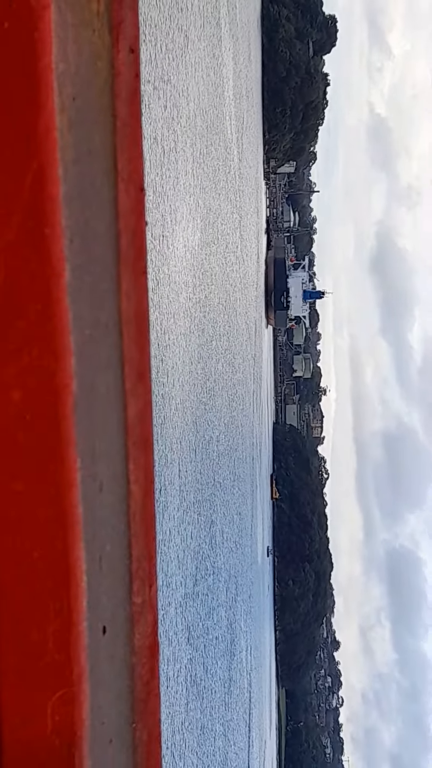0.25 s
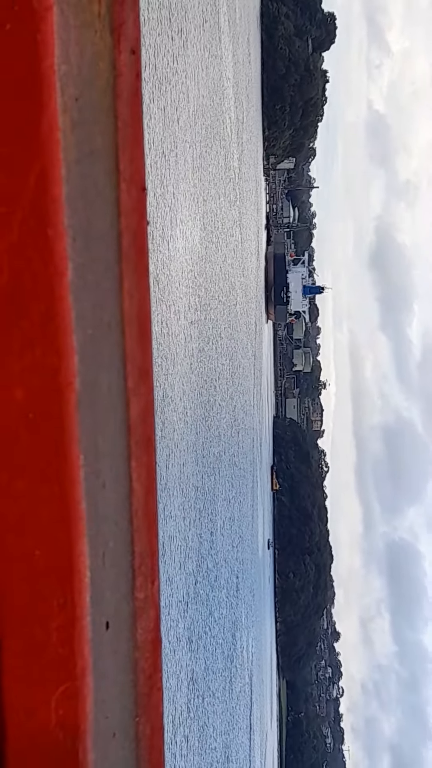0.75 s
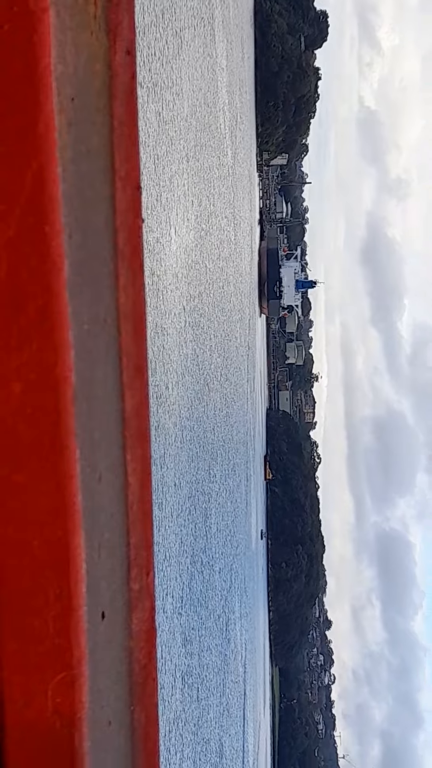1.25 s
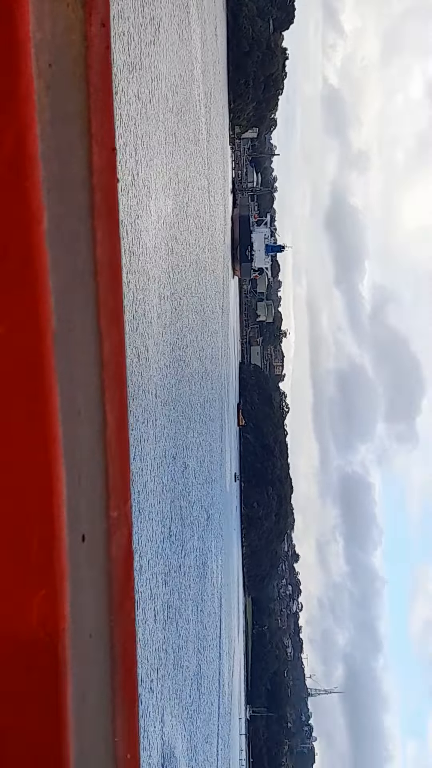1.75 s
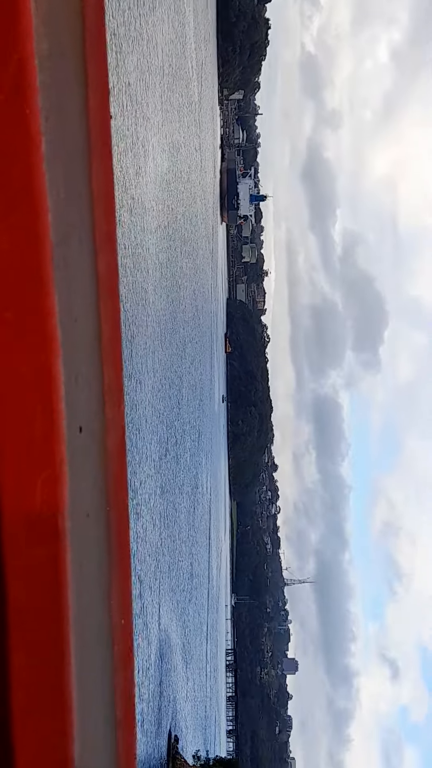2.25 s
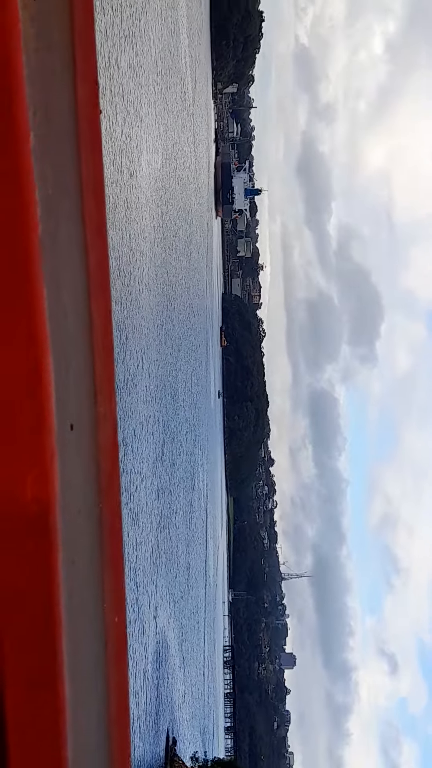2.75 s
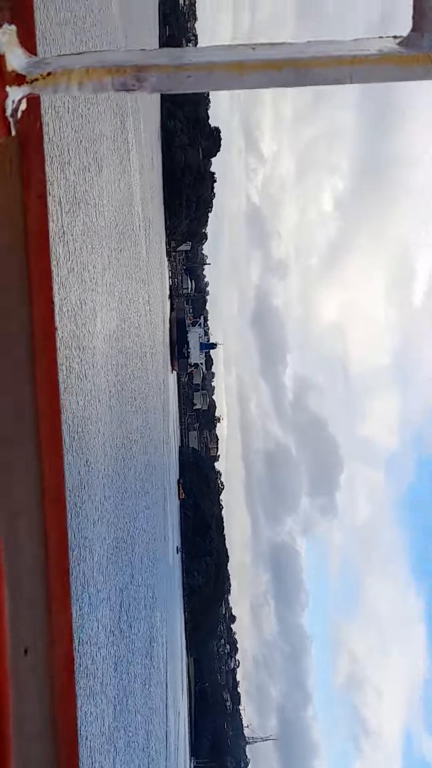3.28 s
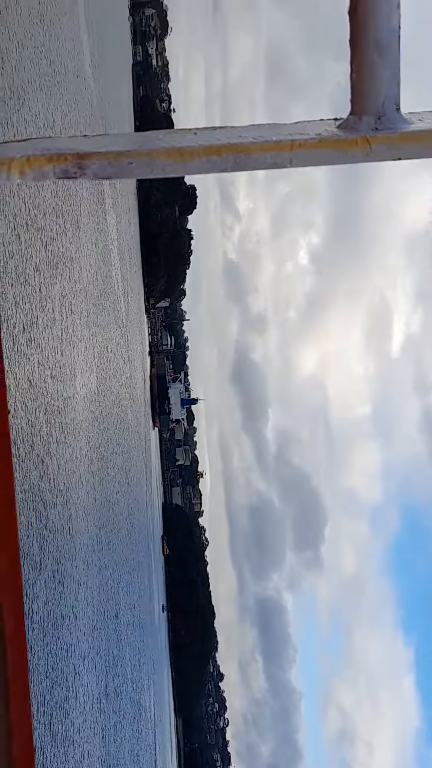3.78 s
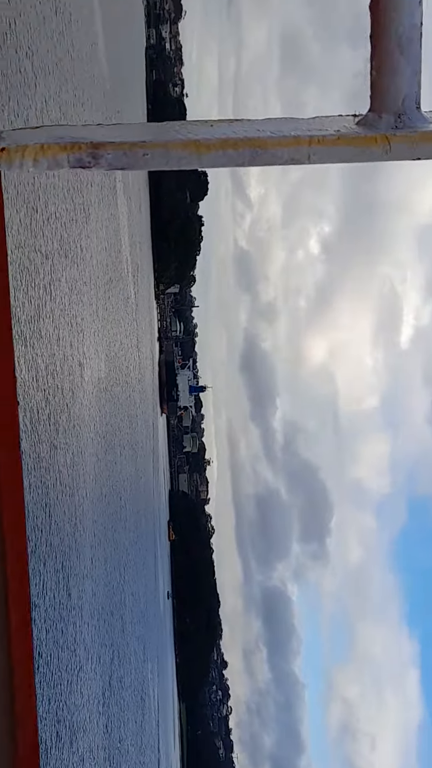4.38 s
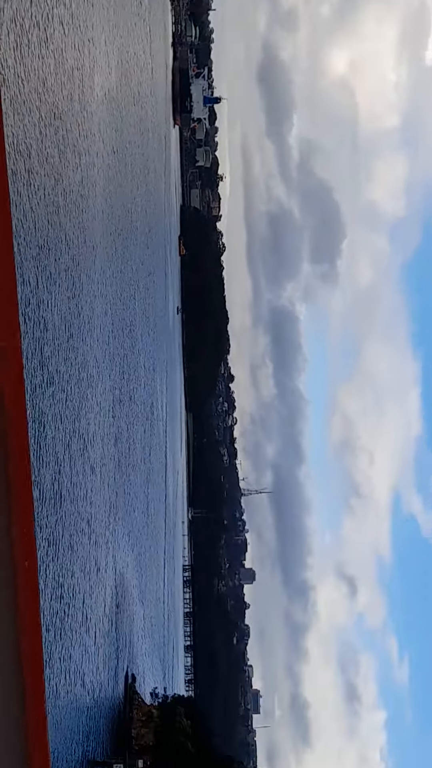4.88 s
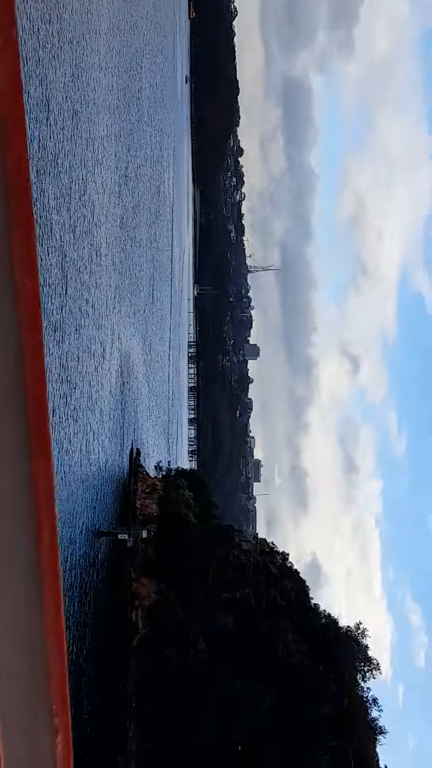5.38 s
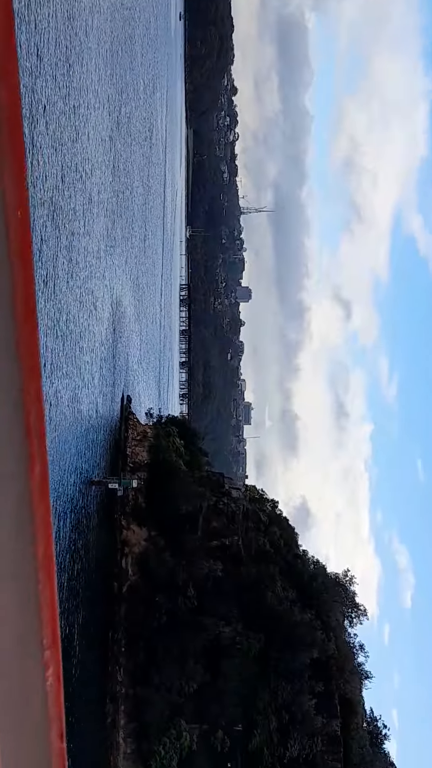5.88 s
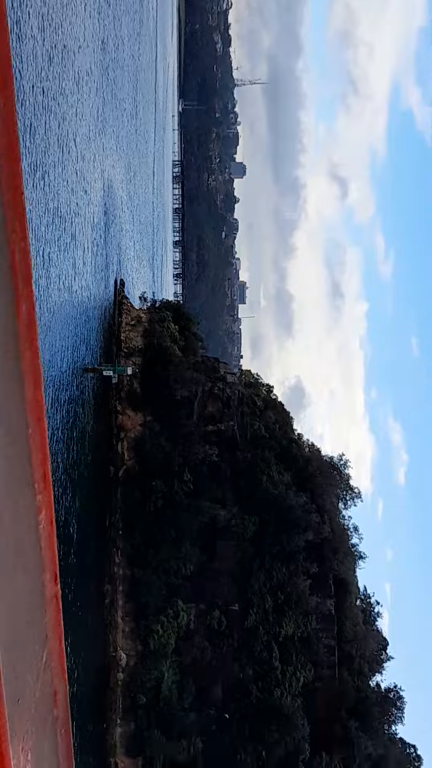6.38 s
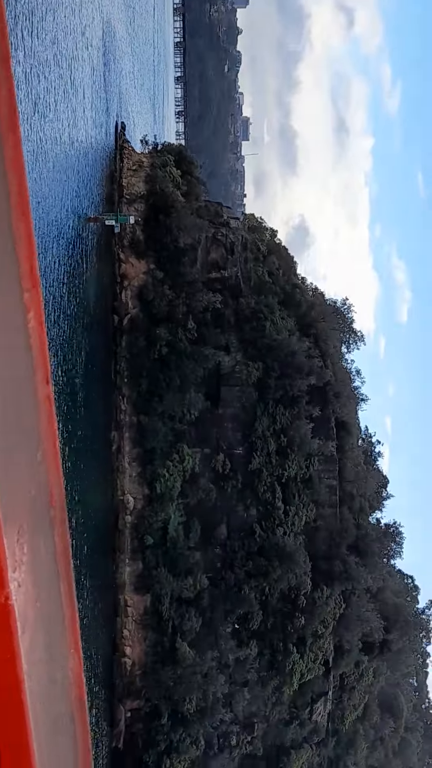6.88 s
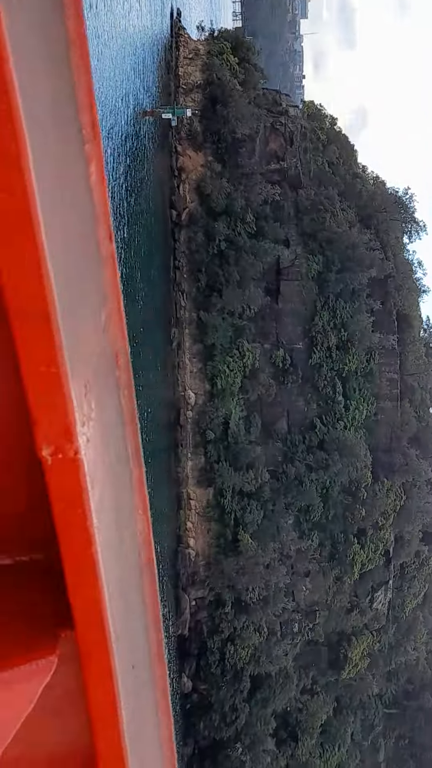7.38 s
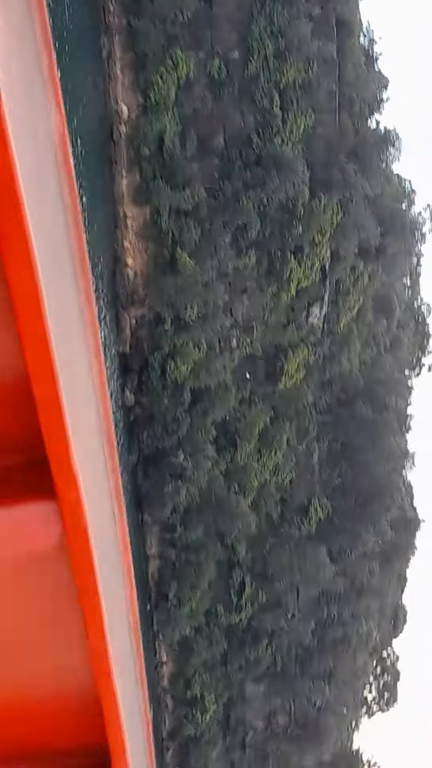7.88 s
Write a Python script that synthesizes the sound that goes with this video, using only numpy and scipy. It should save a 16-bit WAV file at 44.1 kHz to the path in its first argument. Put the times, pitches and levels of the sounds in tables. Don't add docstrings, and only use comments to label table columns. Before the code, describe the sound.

Deep pulsing ship machinery hums beneath rushing vent air; a finger slips off the microphone with thumps and crackle, then the tones slowly swell and sink.

```python
import sys
import numpy as np
from scipy import signal
from scipy.fft import rfft, irfft
from scipy.io import wavfile

SR = 44100
rng = np.random.default_rng(int(sys.argv[2]) if len(sys.argv) > 2 else 0)


def volts_from_db(level):
    exponent = np.asarray(level, float) / 20
    return 10 ** exponent


def wav_out(sig):
    wavfile.write(sys.argv[1], SR, np.round(np.clip(np.atleast_2d(sig).T, -1, 1) * 32767).astype(np.int16))


N = 358974
STEP = 128

# (cycle rate [Hz], moment of one exhaust pulse [s], orders as (multiple, level [dB rms]))
PORT_ENGINE = (8.043, .102, [(6, -45), (7, -25), (8, -30), (9, -47), (14, -48), (18, -49), (21, -49)])
STARBOARD_ENGINE = (8.265, .0725, [(5, -51), (7, -39), (8, -26), (9, -36), (11, -44), (15, -47), (16, -48),
                    (17, -48), (18, -48), (22, -50)])

GENERATOR_HZ, FAN_HZ, PUMP_HZ, MESH_HZ, SHAFT_HZ = 30.097, 270.62, 718.9, 963.58, 6.369
# (multiple, level [dB rms])
GENERATOR_ORDERS = [(4, -45), (7, -43), (8, -49), (13, -48), (14, -56), (15, -57), (17, -60), (19, -56),
                    (33, -49), (44, -50), (55, -65), (66, -68)]
# (shaft multiples from the mesh tone, level [dB rms])
GEAR_SIDEBANDS = [(-14, -60), (-6, -52), (-2, -51), (-1, -47), (2, -51), (4, -57), (8, -57), (10, -55),
                  (12, -59), (14, -56), (18, -65)]
# (frequency [Hz], level [dB rms])
OVERTONES = [(1352, -60), (1437.5, -66), (1523, -68), (1613, -68), (1687, -66), (1797, -66), (1827, -68),
             (1900, -67), (1970, -66), (2018, -66), (2062, -66), (2122, -69), (2317, -69), (2468, -72),
             (2930, -73), (2979, -73)]
# (offset [Hz], level below it [dB], moment in step [s])
BESIDE_11 = [(-.62, -12.8, .32), (.39, -19, 1.08), (-.23, -13.6, 1.69)]
# (offset [Hz], level [dB rms], moment in step [s])
BESIDE_12 = (.35, -38.5, 1.94)
# (time [s], path [m])
ECHO_PATH = [(0, 0), (3, .015), (3.6, -.05), (4.2, -.071), (5, .026), (5.6, .061), (6.2, .093), (6.7, .226),
             (7.15, .3), (7.5, .4), (7.8, .53), (8.14, .6)]
# (left level [dB], right level [dB], echo share [0-1], left trough [turns], right trough [turns])
STANDING = [
    (-32.21, -32.0, 0.95, 0.71, 0.54),
    (-21.99, -19.9, 0.49, 0.09, 0.1),
    (-41.71, -43.97, 0.77, 0.53, 0.21),
    (-33.44, -34.42, 0.58, -0.06, 0.68),
    (-41.06, -39.4, 0.73, 0.51, -0.11),
    (-38.45, -44.65, 0.64, 0.04, 0.59),
    (-40.56, -48.03, 0.73, 0.13, 0.61),
    (-43.91, -49.11, 0.64, -0.07, 0.6),
]
FAN_SLANT, GENERATOR_SLANT, PUMP_SLANT, GEAR_SLANT = -.65, -.75, .96, -.57

# (frequency [Hz], density [dB per Hz])
ROAR_SPECTRUM = [(30, -66), (45, -59.5), (65, -55.5), (100, -49), (180, -64.5), (300, -56.5), (450, -71.5),
                 (650, -67.5), (850, -78.5), (1100, -76), (2000, -81.5), (3200, -90.5), (4800, -96.5),
                 (6500, -99)]
# (frequency [Hz], width [Hz], level [dB rms])
CASINGS = [(337.8, 6.6, -37), (455, 47, -49.5), (676, 54, -42.5), (975, 160, -46), (1336, 77, -50.5),
           (1700, 50, -61.5), (1963, 200, -58.5), (2916, 130, -69), (4670, 610, -68.5)]

# (frequency [Hz], difference [dB])
LEFT_OPEN = [(40, -5), (100, -2), (300, -1), (600, 3.5), (1000, 6), (2000, 10.5), (4000, 13.5), (5500, 10),
             (7000, 20)]
# (frequency [Hz], difference [dB])
LEFT_SHUT = [(40, -6.5), (100, -4), (300, -6.5), (600, -13.5), (1000, -13.5), (2000, -16.5), (3000, -20),
             (4000, -30.5), (6500, -18.5)]
# (frequency [Hz], likeness [0-1])
LIKENESS = [(40, 0.94), (120, 0.51), (300, 0.7), (450, 0.77), (700, 0.15), (1200, 0.023)]
# (time [s], left opening [0-1], left turned to vents [dB], gear and pump lead at left [ms])
HAND = [
    (0, 0.13, -2, 0.63),
    (3.17, 0.04, 8, 0.63),
    (3.225, 0.5, 6.5, 0.44),
    (3.25, 0.99, -3, 0.32),
    (4, 1, -2.5, 0.36),
    (5, 0.98, -0.5, 0.43),
    (6, 0.98, 0.5, 0.45),
    (7, 1, -1.5, -0.44),
    (7.6, 0.99, -1, -0.095),
    (8.14, 1, -1, -0.15),
]

# (time [s], peak [dB], air push [Hz], t60 [s], direction [+1 or -1])
POPS = [
    (3.2095, -15, 130, .03, 1),
    (3.2175, -10, 170, .012, -1),
    (3.2203, -10, 112, .08, 1),
    (3.2415, -9, 150, .02, 1),
    (3.2481, 2.5, 195, .009, -1),
    (3.2501, -6, 100, .035, 1),
]
# (start [s], hold [s], level [dB])
CRACKLES = [
    (3.22, .0005, -36),
    (3.226, .012, -46),
    (3.2405, .005, -25),
    (3.2485, .0008, -21),
]
# (start [s], hold [s], level [dB], firm dull part [dB], fall [dB per s])
STROKES = [
    (3.239, 0.011, -54.5, -8.5, 400.5),
    (3.587, 0.024, -54, 7.5, 190),
    (3.689, .04, -56.5, -1.5, 90),
    (3.919, 0.12, -49.5, 3, 170.5),
    (4.389, .02, -64.5, -10, 97.5),
    (4.614, 0.28, -66.5, -5.5, 150),
    (5.297, .14, -58.5, -9.5, 39),
    (5.6, .25, -66, -15.5, 39.5),
]
# (frequency [Hz], density [dB per Hz])
SKIN_SPECTRUM = [(7500, -33.5), (8500, -17.5), (9500, -6.5), (13000, -0.5), (15000, 1), (15800, -2.5)]
# (frequency [Hz], density [dB per Hz])
FIRM_SPECTRUM = [(2000, -21), (4000, -2), (5500, -2), (7000, -6.5), (8200, -20.5)]
# (time [s], peak [dB])
TICKS = [
    (2.719, -52),
    (2.741, -51.5),
    (2.744, -50),
    (2.762, -49),
    (2.774, -51),
    (2.786, -43.5),
    (2.804, -51.5),
    (2.812, -34),
    (3.371, -43.5),
    (4.14, -48),
]
# (start [s], hold [s], level [dB])
SCUFF = (2.735, .08, -70.5)


def in_time(rows):
    s, *columns = np.transpose(rows)
    return [np.interp(np.arange(N // STEP + 2) * STEP / SR, s, c) for c in columns]


def fine(control):
    return np.interp(np.arange(N) / STEP, np.arange(len(control)), control)


def at_hz(points, hz):
    points_hz, db = np.transpose(points)
    return np.interp(np.log(hz), np.log(points_hz), db)


def rms_one(x):
    return x / np.sqrt(np.mean(x ** 2))


def drift(rate):
    r = np.exp(-2 * np.pi * STEP * rate / SR)
    noise = rng.standard_normal(N // STEP + 2002)
    slow = signal.lfilter([1], [1, -2 * r, r * r], noise)[2000:]
    return slow / slow.std()


def coloured(spectrum):
    hz = np.maximum(np.arange(N // 2 + 1) * SR / N, 1)
    return rms_one(irfft(rfft(rng.standard_normal(N)) * volts_from_db(at_hz(spectrum, hz)), N))


def touch(start_s, hold_s, db, rise_db_s, fall_db_s):
    t = np.arange(N) / SR
    before = np.maximum(start_s - t, 0)
    after = np.maximum(t - start_s - hold_s, 0)
    return volts_from_db(db - rise_db_s * before - fall_db_s * after)


def left_db(hz, finger_only=False):
    opening, turn_db, _ = in_time(HAND)
    free = 0 if finger_only else at_hz(LEFT_OPEN, hz) + turn_db * min(hz / 400, 1)
    return opening * free + (1 - opening) * at_hz(LEFT_SHUT, hz)


def tone(hz, db_left, db_right, turns, lead=0, flutter_db=0.15, wander=0.01):
    phase = 2 * np.pi * (hz * np.arange(N) / SR + turns + fine(wander * drift(1.1)))
    apart = 2 * np.pi * fine(lead + .04 * min(hz / 800, 1) ** 2 * drift(.3))
    flutter = flutter_db * drift(3.8)
    left = fine(volts_from_db(db_left + flutter)) * np.cos(phase + apart)
    right = fine(volts_from_db(db_right + flutter)) * np.cos(phase)
    return np.sqrt(2) * np.array([left, right])


def steady(hz, db, turns, **how):
    return tone(hz, db + left_db(hz), db, turns, **how)


def hiss():
    left = volts_from_db(-78 + 1 * np.arange(N) / SR)
    right = volts_from_db(-73) + touch(*SCUFF, 300, 400)
    shut_db, open_db = -97.5, -67.5
    air = fine(volts_from_db(shut_db + (open_db - shut_db) * in_time(HAND)[0]))
    top = [(3000, -14), (7500, -17), (9000, -8.5), (11000, -3.5), (14000, -3.0), (15500, -3)]
    air_spectrum = [(7000, -8.0), (8200, -2), (10500, -1.0), (13000, -3.0), (15500, -11.5)]
    return np.array([left * coloured(top) + air * coloured(air_spectrum), right * coloured(top)])


def at_ports(pair, hz, db):
    alike = at_hz(LIKENESS, hz)
    mid = np.sqrt((1 + alike) / 2) * pair[0]
    side = np.sqrt((1 - alike) / 2) * pair[1]
    return np.array([fine(volts_from_db(db + left_db(hz))) * (mid + side), fine(volts_from_db(db)) * (mid - side)])


def roar(patchy_db=0.8):
    out, together = 0, drift(3)
    edges = 26 * 2 ** np.arange(0, 8.3, 1 / 3)
    white = rng.standard_normal((2, 2, N))
    for k, (low, high) in enumerate(zip(edges, edges[1:])):
        band = signal.butter(2, [low, high], "band", fs=SR, output="sos")
        pair = signal.sosfilt(band, white[k % 2]) * np.sqrt(SR / 2)
        hz = np.sqrt(low * high)
        flicker_db = patchy_db * (.5 * together + drift(14))
        out += at_ports(pair, hz, at_hz(ROAR_SPECTRUM, hz) + flicker_db)
    for k, (hz, width, db) in enumerate(CASINGS):
        r = np.exp(-np.pi * width / SR)
        ring = [1, -2 * r * np.cos(2 * np.pi * hz / SR), r * r]
        pair = white[k % 2, :, ::-1]
        for _ in range(2):
            pair = signal.lfilter([1, 0, -1], ring, pair)
        out += at_ports(rms_one(pair), hz, db + 1.2 * drift(8))
    return out


def with_starboard(hz, order, in_step_s):
    cycle_hz, pulse_s, _ = STARBOARD_ENGINE
    return order * cycle_hz * (in_step_s - pulse_s) - hz * in_step_s


def with_echo(hz, slant, share, trough):
    path_turns = hz * abs(slant) * in_time(ECHO_PATH)[0] / 343
    turns = np.sign(slant) * (path_turns - trough)
    both = 1 - share * np.exp(2j * np.pi * turns)
    return 20 * np.log10(np.abs(both)), np.angle(both / both[0]) / (2 * np.pi)


def echoed(hz, slant, standing, lead_s, beside=(), shifted=True):
    left_level_db, right_level_db, share, left_trough, right_trough = standing
    left, left_shift = with_echo(hz, slant, share, left_trough)
    right, right_shift = with_echo(hz, slant, share, right_trough)
    left = left + left_level_db + left_db(hz, finger_only=True)
    right = right + right_level_db
    turns = rng.random()
    lead = hz * lead_s + shifted * (left_shift - right_shift)
    return sum(tone(hz + off, left + db, right + db, turns - off * s, lead=lead, flutter_db=0.7)
               for off, db, s in [(0, 0, 0), *beside])


def generator():
    hz_3, hz_5, hz_12 = GENERATOR_HZ * np.array([3, 5, 12])
    boom_db = -45 + 13.5 * np.exp(-np.arange(N // STEP + 2) * STEP / SR / 3.1)
    start_3 = with_starboard(hz_3, order=11, in_step_s=.2)
    out = steady(hz_3, boom_db, start_3, flutter_db=-1.0, wander=0.031)
    out += steady(hz_5, -34, with_starboard(hz_5, order=18, in_step_s=0.009))
    off, db, s = BESIDE_12
    return out + steady(hz_12, -52.5, 0) + steady(hz_12 + off, db, -off * s)


def auxiliaries():
    lead_s = in_time(HAND)[2] / 1000
    hz_11, hz_22 = GENERATOR_HZ * 11, GENERATOR_HZ * 22
    weak = [(k * GENERATOR_HZ, db) for k, db in GENERATOR_ORDERS]
    weak += [(hz_11 + side * SHAFT_HZ, -43.0) for side in (-1, 1)]
    out = generator()
    for hz, db in weak + list(OVERTONES):
        out += steady(hz, db, rng.random(), flutter_db=0.5, wander=hz / 8000)
    for k, db in GEAR_SIDEBANDS:
        hz = MESH_HZ + k * SHAFT_HZ
        out += steady(hz, db, rng.random(), lead=hz * lead_s, flutter_db=1.5, wander=.08)
    hum_lead_s = .0001 - 0.00031 * in_time(HAND)[0]
    fan, order_11, fan_2, order_22, pump, *gear = STANDING
    out += echoed(FAN_HZ, FAN_SLANT, fan, 0)
    out += echoed(2 * FAN_HZ, FAN_SLANT, fan_2, hum_lead_s)
    out += echoed(hz_11, GENERATOR_SLANT, order_11, 0, BESIDE_11)
    out += echoed(hz_22, GENERATOR_SLANT, order_22, hum_lead_s)
    out += echoed(PUMP_HZ, PUMP_SLANT, pump, lead_s, shifted=False)
    for k, row in zip((1, 0, 6), gear):
        out += echoed(MESH_HZ + k * SHAFT_HZ, GEAR_SLANT, row, lead_s, shifted=False)
    return out


def ticks():
    clicks = np.zeros(N)
    for s, db in TICKS:
        clicks[round(s * SR)] = volts_from_db(db + 5.5)
    bright = signal.sosfilt(signal.butter(2, 10500, "high", fs=SR, output="sos"), clicks)
    return np.array([volts_from_db(-15.0) * bright, bright + volts_from_db(-21.0) * clicks])


def finger():
    t, pushes = np.arange(N) / SR, np.zeros(N)
    for s, db, hz, t60, direction in POPS:
        since = np.maximum(t - s, 0)
        pushes += direction * volts_from_db(db - 60 * since / t60 + 5) * np.sin(2 * np.pi * hz * since)
    pushes = signal.sosfilt(signal.butter(3, 1400, fs=SR, output="sos"), pushes)
    peel = sum(touch(*row, 7002, 5500.5) for row in CRACKLES)
    peel_spectrum = [(200, -5), (700, -2), (1800, -9), (2600, -19), (6000, -31), (8000, -58), (13000, -44)]
    rub, firm = np.zeros(N), np.zeros(N)
    for s, hold_s, db, firm_db, fall_db_s in STROKES:
        stroke = touch(s, hold_s, db, 382, fall_db_s)
        rub += stroke
        firm += volts_from_db(firm_db) * stroke
    left = pushes + peel * coloured(peel_spectrum)
    left += rub * coloured(SKIN_SPECTRUM) + firm * coloured(FIRM_SPECTRUM)
    leak = volts_from_db(-19.5) * rub * coloured([(10000, -36.5), (13500, -16.5), (15500, 1.0)])
    return np.array([left, leak])


def main_engine(cycle_hz, pulse_s, orders):
    return sum(steady(k * cycle_hz, db, -k * cycle_hz * pulse_s, flutter_db=0.46, wander=0.0074)
               for k, db in orders)


def through_ports(ship):
    opening = fine(in_time(HAND)[0])
    early = np.pad(ship[0, 14:], (0, 14), "edge")
    late = np.pad(ship[0, :-17], (17, 0), "edge")
    left = opening * early + (1 - opening) * late
    return np.array([signal.sosfilt(signal.butter(8, top_hz, fs=SR, output="sos"), x)
                     for top_hz, x in ((7260, left), (5650, ship[1]))])


def scene():
    ship = roar() + auxiliaries() + main_engine(*PORT_ENGINE) + main_engine(*STARBOARD_ENGINE)
    return through_ports(ship) + ticks() + finger()


def roll_off(x):
    return signal.sosfilt(signal.butter(12, 15900, fs=SR, output="sos"), x)


def record(dry):
    return roll_off(np.clip(dry + hiss(), -.98, .98))


dry = scene()
out = record(dry)
wav_out(out)
```